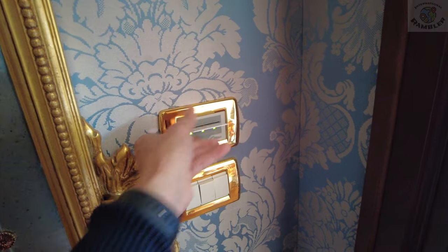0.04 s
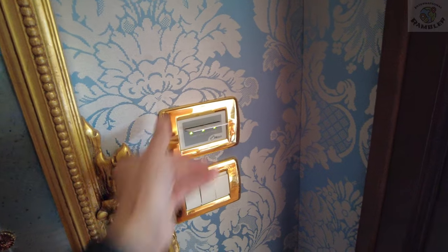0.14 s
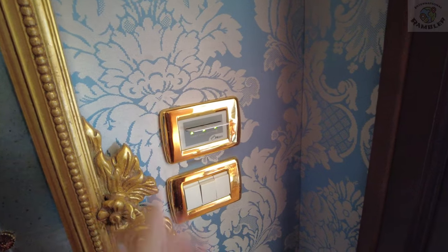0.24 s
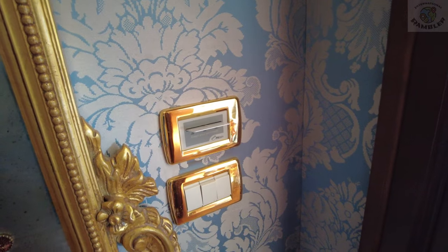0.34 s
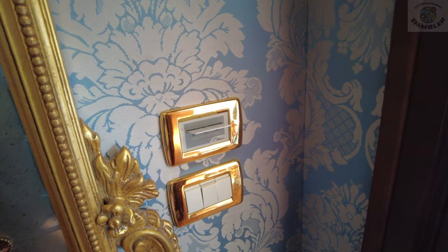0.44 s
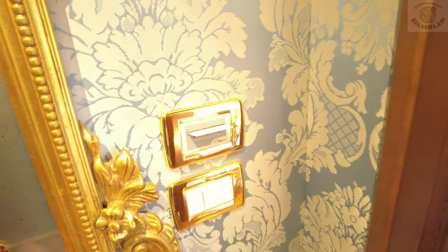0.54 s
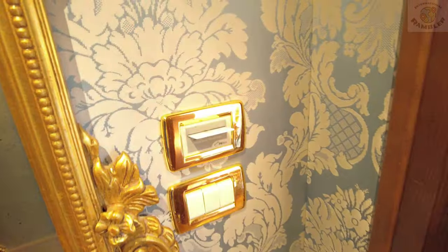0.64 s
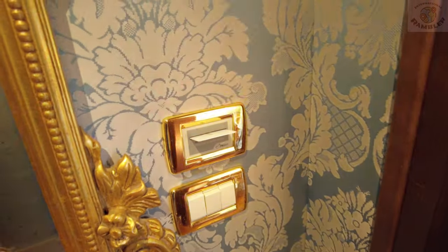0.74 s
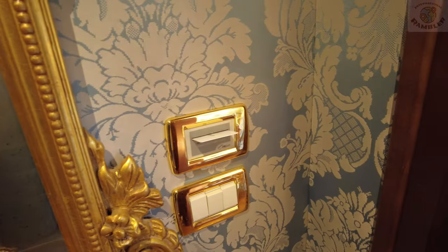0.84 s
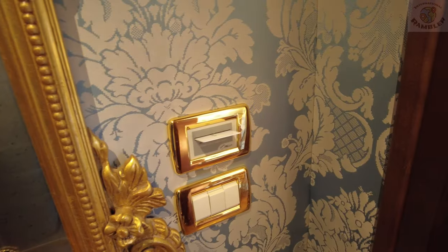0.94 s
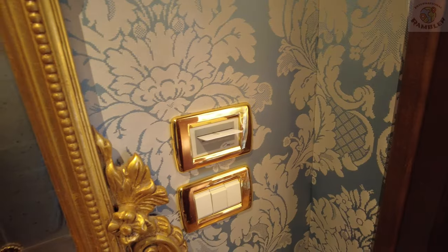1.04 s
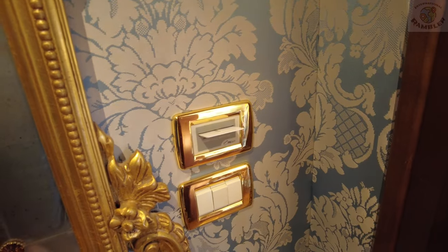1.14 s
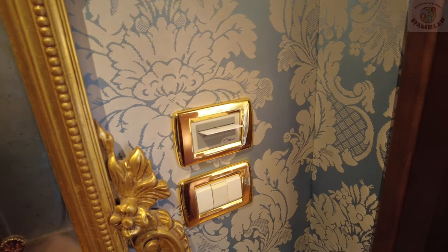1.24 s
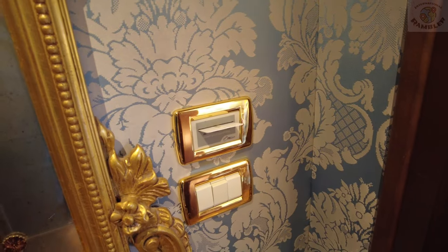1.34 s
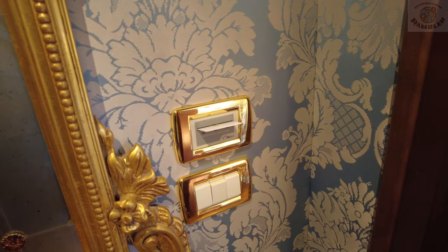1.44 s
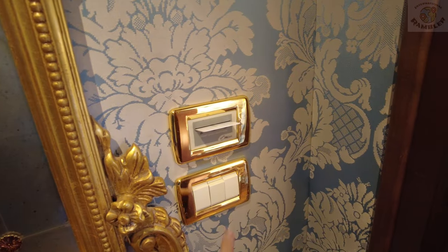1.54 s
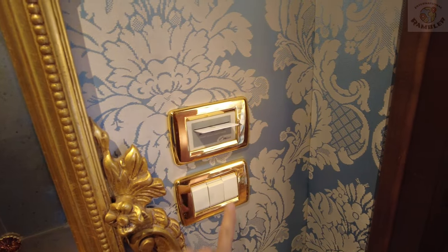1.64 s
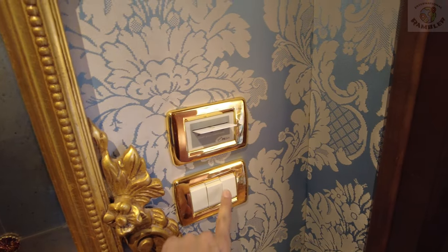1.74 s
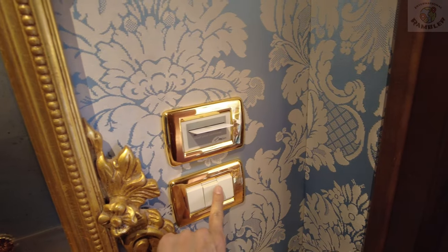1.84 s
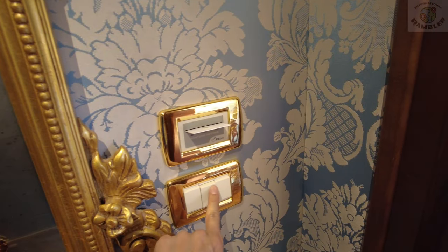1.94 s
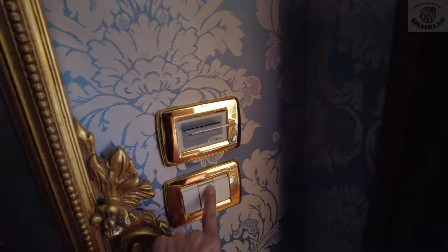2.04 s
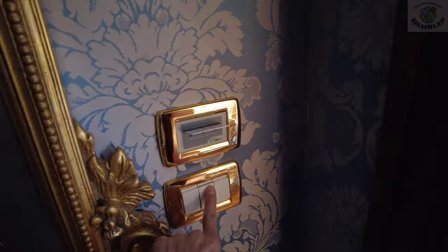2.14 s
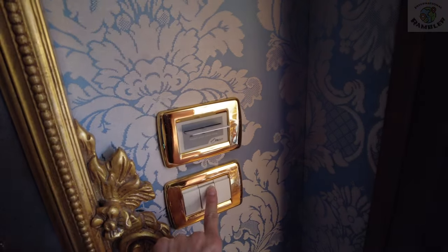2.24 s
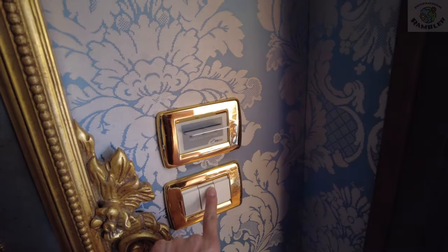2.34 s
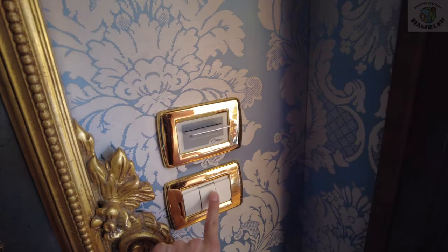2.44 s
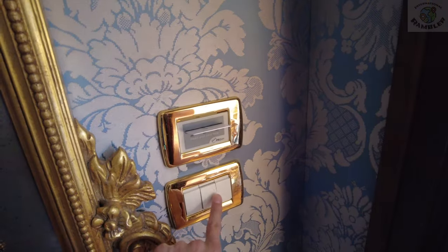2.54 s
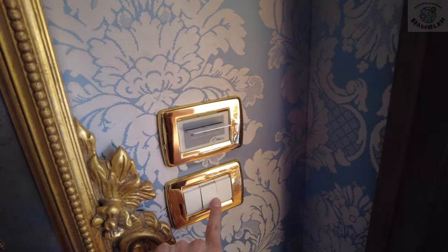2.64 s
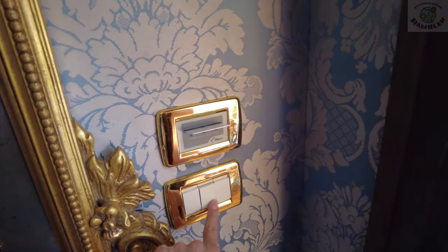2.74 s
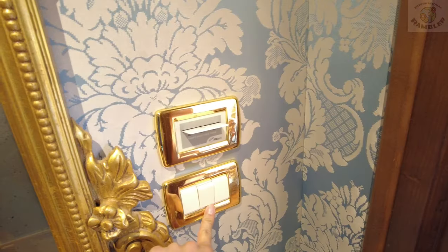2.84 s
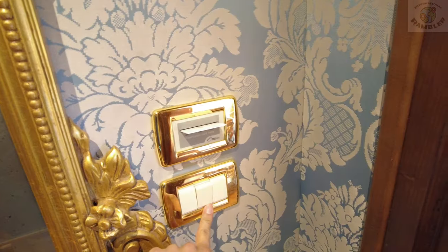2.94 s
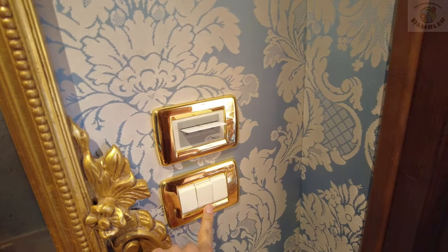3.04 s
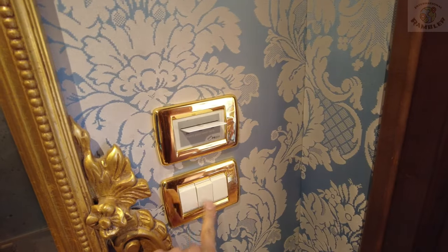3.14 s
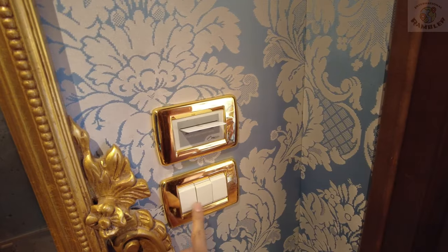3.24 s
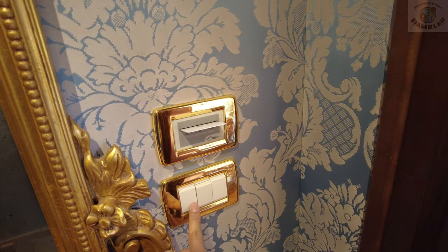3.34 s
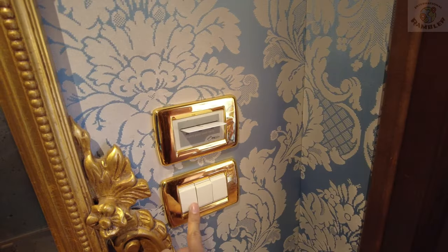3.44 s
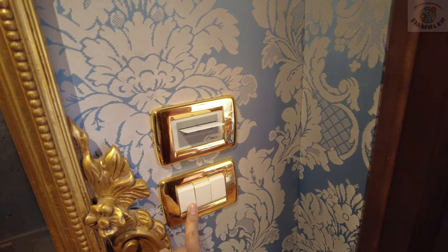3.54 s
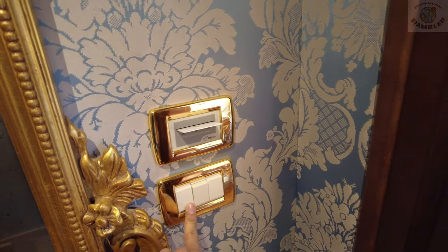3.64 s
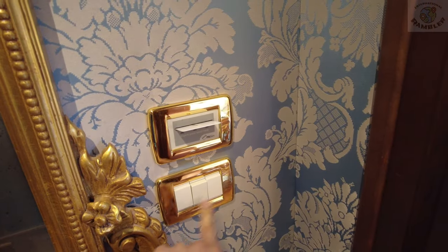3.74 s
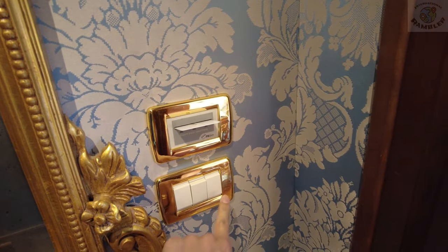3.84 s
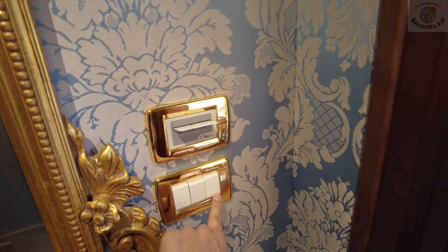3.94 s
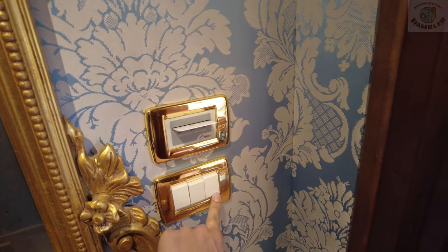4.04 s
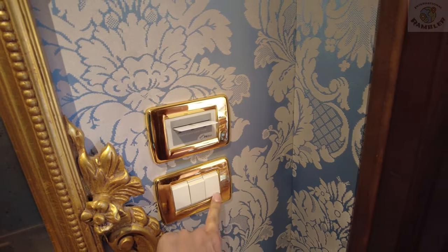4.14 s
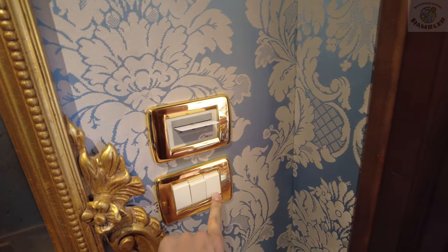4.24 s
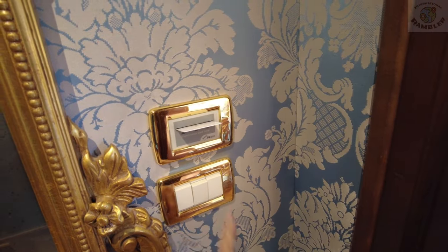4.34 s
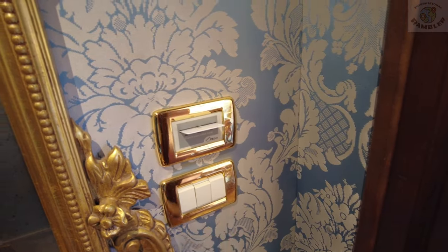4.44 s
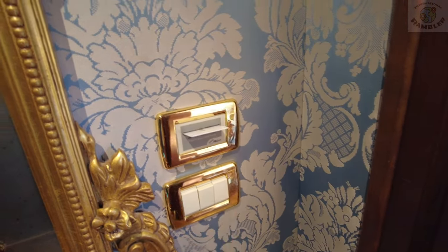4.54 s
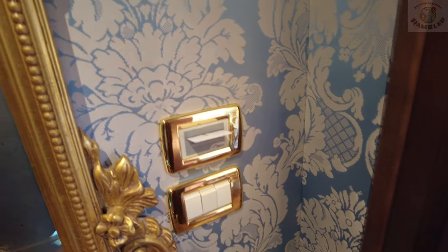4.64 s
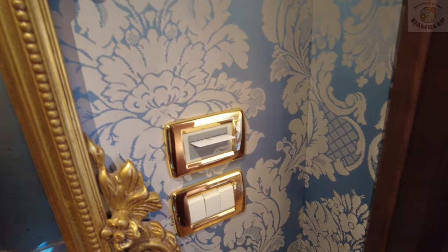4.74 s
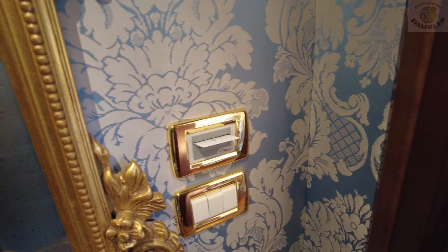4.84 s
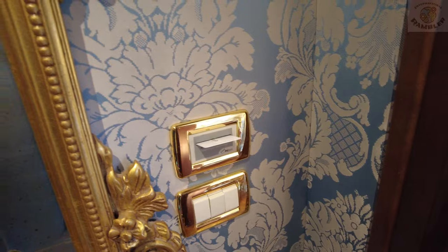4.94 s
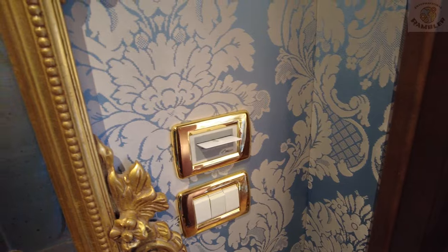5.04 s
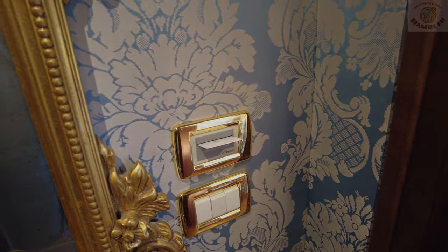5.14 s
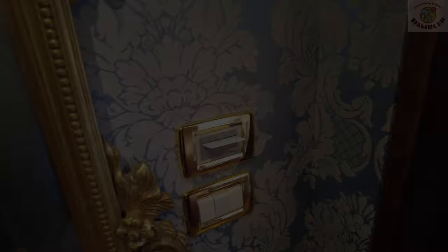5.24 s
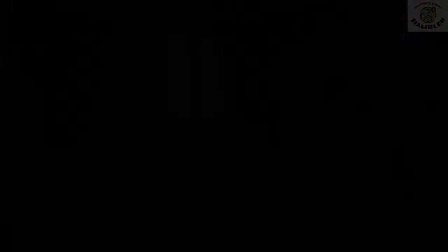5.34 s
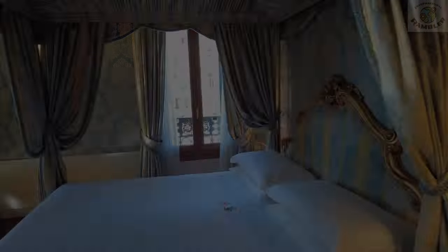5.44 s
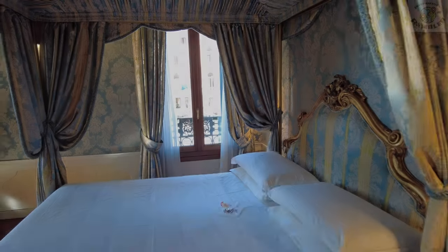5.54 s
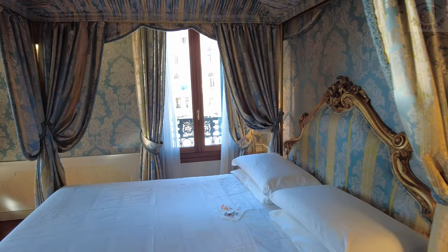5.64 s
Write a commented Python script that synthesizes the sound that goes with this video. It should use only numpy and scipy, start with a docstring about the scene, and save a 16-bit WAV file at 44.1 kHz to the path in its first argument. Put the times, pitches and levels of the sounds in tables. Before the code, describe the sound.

A very low machinery drone, around 50 Hz, wavers and throbs throughout, with a trace of mains hum and faint hiss. The microphone is close, in a small soft room with a brief answer. At the start there are very faint finger touches, a soft low push and rustling sleeve cloth. A tap at 0.46 s leads into a loud, scraping plastic crunch at 0.53 s as a card seats, with a deep wall thump. Cloth rustles to about 1.8 s. A light tap at 1.94 s precedes a bright, hard rocker snap at 2.15 s. Soft touches and a low push come near 2.6 s, then a snap at 2.84 s and a weaker, duller one at 2.93 s, with a brief scuff between. Dull plate taps follow at 3.09, 3.53 and 3.77 s. After a lull, cloth swells around 5.0 s, ending with a faint scuff and soft thump at 5.55 s.

```python
"""A machinery drone and room tone run throughout under a rustling sleeve, with fingertip taps and soft wall thumps.
A card holder latches with a crunch; plastic rocker switches snap over close by in a small soft room; a hand scuffs.
Contacts are chattering noise bursts that ring damped modes or take a spectral colour, with the room's answer added.
Cloth, scuffs, rumble and room tone are shaped stereo noise; the drone is two wavering tones with mains hum."""
import sys
import numpy as np
from scipy import signal
from scipy.fft import rfft, irfft, next_fast_len
from scipy.io import wavfile
from scipy.ndimage import uniform_filter1d, map_coordinates

SR = 44100
rng = np.random.default_rng(int(sys.argv[2]) if len(sys.argv) > 2 else 0)


def wrap_up_sound(samples):
    """Save the sound to the file named by the first command line argument, as 16-bit audio."""
    columns = np.atleast_2d(samples).T
    # keep every value between -1 and 1, then stretch to whole-number steps
    tamed = np.clip(columns, -1, 1)
    steps = np.round(tamed * 32767).astype(np.int16)
    wavfile.write(sys.argv[1], SR, steps)


N = 250483
BLOW_AT = SR // 100  # samples before the blow in every burst
TAIL = SR // 3  # samples of ringing and of room answer


def amp(db):
    """dB to gain."""
    return 10 ** (np.asarray(db) / 20)


def unit(x):
    """Scaled to rms 1."""
    return x / np.sqrt(np.mean(x ** 2) + 1e-20)


def along(points, hz):
    """Interpolates (frequency [Hz], value) points on a log frequency axis."""
    f, v = np.transpose(points)
    return np.interp(np.log(hz + 1), np.log(f + 1), v)


def curves(rows):
    """One value per sample for each column after the time."""
    s, *cols = np.transpose(rows)
    return [np.interp(np.arange(N) / SR, s, c) for c in cols]


def wobble(rate_hz):
    """Smooth random curve, rate_hz knots a second."""
    knots = rng.standard_normal(int(N * rate_hz / SR) + 4)
    return map_coordinates(knots, [np.arange(N) * rate_hz / SR])


def filtered(x, response):
    """x times a response of frequency."""
    m = next_fast_len(x.shape[-1] + 8192)
    spectrum = rfft(x, m) * response(np.fft.rfftfreq(m, 1 / SR))
    return irfft(spectrum, m)[..., :x.shape[-1]]


def rush(spectrum, alike, patchy_db):
    """Stereo noise of rms 1 with time-frequency patches of random gain."""
    z = signal.stft(rng.standard_normal((2, N)), nperseg=512)[2]
    field = uniform_filter1d(rng.standard_normal(z.shape[1:]), size=6, axis=0)
    field = uniform_filter1d(field, size=10, axis=1)
    pair = signal.istft(z * amp(patchy_db * unit(field)), nperseg=512)[1][:, :N]

    def mid_side(hz):
        turn = np.arccos(np.clip(along(alike, hz), -1, 1)) / 2
        return amp(along(spectrum, hz)) * [np.cos(turn), np.sin(turn)]

    mid, side = filtered(pair, mid_side)
    return unit(np.array([mid + side, mid - side]))


def ring(hz, t60_s, db, rise_s=1e-4):
    """Summed damped modes after one blow."""
    t = np.arange(TAIL)[:, None] / SR
    decay = amp(db - 60 * t / t60_s)
    return (decay * np.sin(2 * np.pi * hz * t) * (1 - np.exp(-t / rise_s))).sum(axis=1)


def chatter(length_s, lead_s=0.002, swell=0.31, evenness=0.58):
    """Uneven contacts of energy 1: a short faint lead-in, then a blow which dies fast."""
    t = np.arange(-BLOW_AT, SR // 20) / SR
    after = np.maximum(t, 0)
    lead_in = 0.18 * np.exp(-np.abs(t) / lead_s)
    blow = (1 - np.exp(-after / (swell * length_s))) * np.exp(-after / length_s)
    shape = lead_in + blow
    z = rfft(shape * rng.standard_normal(len(t)))
    even = irfft(z / np.abs(z) ** evenness, len(t))  # flatter spectrum: levels stay steady between draws
    burst = even * np.sqrt(shape)
    return burst / np.linalg.norm(burst)


# reverberation: (frequency [Hz], t60 [s])
ROOM_T60 = [(200, 0.6), (500, 0.23), (1400, 0.13), (4000, 0.12), (10000, 0.092)]
# side to mid of the room's answer: (frequency [Hz], ratio)
ROOM_SPREAD = [(100, .1), (300, 0.19), (550, 0.75), (1200, 0.17), (2500, 0.3), (8000, 1)]


def room(x):
    """Room answer: each frequency dies at its own speed; bass is alike at both ports."""
    hz, t, z = signal.stft(rng.standard_normal((2, TAIL)), SR, nperseg=256)
    width = along(ROOM_SPREAD, hz)[:, None]
    z = np.array([z[0] + width * z[1], z[0] - width * z[1]]) / np.sqrt(1 + width ** 2)
    decay = amp(-60 * t / along(ROOM_T60, hz)[:, None])
    tail = signal.istft(z * decay, SR, nperseg=256)[1]
    tail = tail / np.linalg.norm(tail[0])
    delayed = np.pad(x, (130, 0))[None]
    return signal.fftconvolve(delayed, tail, axes=1)[:, :len(x)]


# phase lead of the left port over the right: (frequency [Hz], lead [rad])
PORT_LEAD = [(500, -0.5), (2500, 1.6), (5000, -0.18), (9000, 1.56), (15000, 1.5)]


def add(track, s, x, wet_db):
    """Mixes a burst and the room's answer into both ports, with its blow at time s."""
    x = np.pad(x, (0, TAIL))

    def ports(hz):
        half_lead = .5j * along(PORT_LEAD, hz) * np.array([[1], [-1]])
        return amp([[.3], [-.3]]) * np.exp(half_lead)

    heard = filtered(x, ports) + amp(wet_db) * room(x)
    part = track[:, round(s * SR) - BLOW_AT:][:, :len(x)]
    part += heard[:, :part.shape[1]]


# drone levels, upper before its throb: (time [s], lower tone rms [dB], upper tone rms [dB])
DRONE_LEVELS = [(0.0, -35.5, -39), (0.35, -29, -29.5), (0.72, -40.5, -29.5), (1.09, -25, -37),
                (1.441, -35, -32), (2.501, -31.5, -40), (3.15, -27.5, -37), (3.57, -41, -35),
                (4.05, -29.5, -33.5), (4.7, -37, -29.5), (4.86, -27, -30.5), (5.39, -26.5, -35),
                (5.68, -44, -30)]
# lower and upper room resonance: (frequency [Hz], wander [Hz])
DRONE_TONES = [(46.3, 0.796), (57.5, 2.46)]
# mains hum: (frequency [Hz], rms level [dB])
HUM = (100, -52)
# rumble colour: (frequency [Hz], relative density [dB per Hz])
RUMBLE_COLOUR = [(11, -45), (18, -2), (32, -7), (54, -4.5), (71, -16), (86, -19), (118, -23.5), (150, -32),
                 (169, -24), (300, -38.5), (390, -52.5), (660, -120)]
RUMBLE_DB, SURGE_DB = -34.5, 2
THROB_HZ, THROB_DEPTH = 3.6, 0.65


def drone():
    """Machinery drives the lowest room resonances: two wavering tones, the upper throbbing, hum and rumble."""
    def sine(hz, drift_hz):
        cycles = np.cumsum(hz + drift_hz * wobble(5.8)) / SR + rng.random()
        return np.sin(2 * np.pi * cycles)

    low, high = (amp(db + 1.45 * wobble(4.98)) * sine(*tone)
                 for db, tone in zip(curves(DRONE_LEVELS), DRONE_TONES))
    tones = low + high * (1 + THROB_DEPTH * sine(THROB_HZ, 0.96))
    hum_hz, hum_db = HUM
    hum = amp(hum_db) * sine(hum_hz, .1)
    alike = [(30, 1.0), (90, 0.91), (150, .93), (300, 0.67)]  # (frequency [Hz], left-right likeness)
    rumble = amp(RUMBLE_DB + SURGE_DB * wobble(4.1)) * rush(RUMBLE_COLOUR, alike, patchy_db=1.43)
    return np.sqrt(2) * (tones + hum) * amp([[-.25], [.25]]) + rumble  # sqrt(2): sine peak over rms


# room tone colour: (frequency [Hz], relative density [dB per Hz])
HISS_COLOUR = [(120, -17), (200, -3.5), (300, -15), (450, -14.5), (700, -22), (1400, -20), (3000, -24),
               (5200, -26), (9000, -32.5), (12500, -38.5), (14500, -32.5), (15700, -30.5)]
# room tone: (frequency [Hz], left-right likeness)
HISS_ALIKE = [(60, 0.85), (180, 1), (550, 0.08), (1650, 0.052), (4970, 0.48), (15000, 0.29)]
HISS_DB, HISS_SWING_DB = -54, 1.5


def room_tone():
    """Coloured noise whose level swings slowly."""
    swing_db = HISS_SWING_DB * wobble(3.335)
    return amp(HISS_DB + swing_db) * rush(HISS_COLOUR, HISS_ALIKE, patchy_db=1.5)


# arm strokes: (time of greatest speed [s], rise [s], fall [s], level [dB], brightness at peak [dB per octave])
STROKES = [(.25, 0.26, 0.57, -47.5, 1.5), (.64, 0.17, 0.24, -42, 1.5), (1.06, 0.11, 0.1, -51.5, 2.5),
           (1.18, 0.099, 0.056, -52.5, 6.5), (1.66, 0.37, .2, -47, 2.5), (2.12, 0.088, 0.18, -53.5, -3.5),
           (2.64, 0.25, 0.063, -62, -5), (4.66, 0.28, 0.85, -51.5, 1), (4.999, 0.17, 0.15, -42, 3),
           (5.38, 0.11, 0.12, -57, 0)]
# cloth colour: (frequency [Hz], relative density [dB per Hz])
CLOTH_COLOUR = [(240, -32.5), (420, 2.5), (900, -3.5), (1570, 0.5), (3220, -3), (7950, -19.5),
                (12000, -26.5), (14500, -18), (15700, -30)]
EDGE_DB = 12  # drop one rise or fall away from the peak
DULLING = 0.13  # dB per octave lost per dB under the peak
FLUTTER_DB = .9


def sleeve():
    """Cloth slides on cloth; each stroke swells and fades, brightest at full speed."""
    t, power = np.arange(N) / SR, np.zeros((2, N))
    alike = [(300, 0.73), (700, 0.033), (1400, 0.18), (3000, 0.094), (15000, 0.16)]  # as HISS_ALIKE
    noise = rush(CLOTH_COLOUR, alike, patchy_db=1.0)
    # crossfade over four octaves about 2500 Hz
    dull, bright = (filtered(noise, lambda hz: np.clip(.5 + k * np.log2((hz + 1) / 2500) / 4, 0, 1))
                    for k in (-1, 1))
    for s, rise_s, fall_s, db, tilt_db in STROKES:
        under_db = EDGE_DB * ((t - s) / np.where(t < s, rise_s, fall_s)) ** 2
        tilt_db = np.maximum(tilt_db - DULLING * under_db, -10)
        power += amp(db - under_db + np.outer([-2, 2], tilt_db)) ** 2
    rustle = np.sqrt(power[0]) * dull + np.sqrt(power[1]) * bright
    return amp(FLUTTER_DB * wobble(25)) * rustle


# light touches: (time [s], level [dB], relative tick level [dB], plate pitch factor)
TAPS = [(0.037, -48.5, -8.5, 1.1), (0.048, -49, -12, 0.69), (0.4636, -25, -10.5, 0.92),
        (1.923, -55, -25, 1), (1.939, -39.5, -20, 1.08), (2.6601, -38.5, -23, 0.896),
        (2.6852, -57, -1, 1.04), (3.091, -29, -27, 0.9), (3.5337, -35, -19, 0.91),
        (3.7662, -38.5, -17, 0.99)]
# cover plate modes at pitch factor 1: (frequency [Hz], t60 [s], relative level [dB])
PLATE_MODES = [(1300, 0.0027, -13), (1572, 0.016, 0.5), (1700, 0.016, -1.5), (2030, 0.011, -3),
               (2444, 0.019, -8), (2910, 0.01, -11), (3530, 0.014, -10.5), (4480, 0.01, -11)]
# nail tick colour: (frequency [Hz], relative density [dB per Hz])
NAIL_COLOUR = [(1000, 0), (3000, 8), (6000, 2.5), (10000, 3), (15000, 1.5)]
TOUCH_S, TICK_DB, TAP_WET_DB = 0.0023, 25, -3.5


def taps():
    """Fingertip and nail touch the cover plate: a dull ring and a bright tick."""
    out = np.zeros((2, N))
    hz, t60_s, mode_db = np.transpose(PLATE_MODES)
    for s, db, tick_db, pitch in TAPS:
        plate = signal.fftconvolve(chatter(TOUCH_S), ring(hz * pitch, t60_s, mode_db))
        tick = filtered(chatter(TOUCH_S), lambda f: amp(along(NAIL_COLOUR, f)))
        add(out, s, amp(db) * plate, TAP_WET_DB)
        add(out, s, amp(db + tick_db + TICK_DB) * tick, TAP_WET_DB)
    return out


# soft pushes: (time [s], level [dB], tilt [dB per octave])
THUMPS = [(.05, -23, 7.5), (.548, -9.5, -1), (2.572, -22.5, 8), (5.56, -29.5, 6)]
# wall modes: (frequency [Hz], t60 [s], relative level [dB])
WALL_MODES = [(80.5, 0.21, 0), (119, 0.37, -14), (155, 0.19, -15), (176.6, 0.1, -12.5), (251.7, 0.17, -20),
              (404, 0.047, -22)]


def thumps():
    """A soft push moves only the wall's low modes."""
    out = np.zeros((2, N))
    hz, t60_s, mode_db = np.transpose(WALL_MODES)
    for s, db, tilt_db in THUMPS:
        push = ring(hz, t60_s, db + mode_db + tilt_db * np.log2(hz / 150), rise_s=0.0079)
        add(out, s, np.pad(push, (BLOW_AT, 0)), wet_db=-21)
    return out


# card scraping home: (time [s], relative energy [dB], length [s], tilt [dB per octave])
CRUNCHES = [(0.525, 13, 0.013, 5), (0.532, 12, 0.012, -1.5), (.545, 10.5, 0.0081, 1.5)]
# latch colour: (frequency [Hz], relative density [dB per Hz])
LATCH_COLOUR = [(150, -24), (250, -3.5), (421, -2.5), (710, -8), (845, -5), (1010, -10.5), (1530, -5.5),
                (2440, -15), (16000, -35)]


def latch():
    """Plastic scrapes and crunches as the card seats."""
    out = np.zeros((2, N))
    for s, db, length_s, tilt_db in CRUNCHES:
        colour = lambda f: amp(along(LATCH_COLOUR, f) + tilt_db * np.log2((f + 100) / 2000))
        add(out, s, amp(db) * filtered(chatter(length_s), colour), wet_db=-0.5)
    return out


# rocker snaps: (time [s], level [dB], stop struck [0 upper - 1 lower], chatter [s],
#                treble tilt [dB per octave], relative box boom [dB])
SNAPS = [(2.152, -4, 0.12, 0.0047, 2.5, 1), (2.8426, -5.5, 0.95, 0.0024, 2.5, 1.5),
         (2.9259, -13.5, 0.9, 0.0037, -3, 4.5)]
# switch modes: (frequency [Hz], t60 [s], relative level from upper stop [dB], from lower stop [dB])
ROCKER_MODES = [(1288, 0.037, -14.5, -5), (1482, 0.013, 8.5, 3.5), (1716, 0.058, -18, -5),
                (2160, 0.015, -11, -26), (2625, 0.097, -23, -7.5), (3080, 0.013, -0.5, 0.5),
                (3576, 0.05, -7, -24.5), (4040, 0.0063, -4.5, -25.5), (4100, 0.027, -21.5, -10),
                (5730, 0.03, -6, -14), (6580, 0.0165, -9.5, -4.5), (7100, 0.0047, 6, -16.5),
                (9400, .015, -34.5, -26.5), (9380, 0.017, -1.5, -29.5), (12400, 0.013, -23, -22),
                (13440, 0.018, -13.5, -5)]
# wall box modes: same columns
BOX_MODES = [(172, 0.11, -21, -22), (239, 0.079, -14, -14.5), (308, 0.058, -16, -11.5),
             (407, 0.13, -20, -14), (488, 0.042, -25, -8.5), (592, 0.079, -9.5, -15),
             (894, 0.07, -11.5, -34)]
# contact noise of upper stop, lower stop: (frequency [Hz], relative density [dB per Hz])
STOP_COLOURS = ([(700, -30), (1000, -24), (1470, -3), (2300, -27), (3300, 0), (4100, 6.5), (5000, -6.5),
                (10100, -14.5), (13800, -11), (15800, -10.5)], [(700, -48), (1050, -36), (1250, 9.5),
                (1750, 1), (2250, -5.5), (2800, -0.5), (4250, -6.5), (5600, -8), (9000, -14),
                (13000, -16.5), (15800, -16.5)])
RING_DB, CRACK_DB, BOOM_DB = -10, 21.5, -5.5  # shares of a snap
SNAP_WET_DB, BOX_WET_DB = -5.5, -7
SNAP_SWELL = 0.36  # swell time over chatter time


def rockers():
    """The spring throws the rocker on a stop, where it chatters and rings switch and box."""
    out = np.zeros((2, N))
    for s, db, stop, length_s, tilt_db, boom_db in SNAPS:
        hz, t60_s, upper_db, lower_db = np.transpose(ROCKER_MODES)
        mode_db = upper_db + stop * (lower_db - upper_db) + tilt_db * np.log2(hz / 2000)
        ringing = signal.fftconvolve(chatter(length_s, swell=SNAP_SWELL), ring(hz, t60_s, mode_db))
        add(out, s, amp(db + RING_DB) * ringing, SNAP_WET_DB)

        colour = lambda f: amp(along(STOP_COLOURS[round(stop)], f) + tilt_db * np.log2((f + 500) / 2000))
        crack = filtered(chatter(length_s, swell=SNAP_SWELL), colour)
        add(out, s, amp(db + CRACK_DB) * crack, SNAP_WET_DB)

        # the heavy box feels the chatter as one push
        hz, t60_s, upper_db, lower_db = np.transpose(BOX_MODES)
        mode_db = upper_db + stop * (lower_db - upper_db)
        boom = ring(hz, t60_s, db + BOOM_DB + mode_db + boom_db, rise_s=0.0024)
        add(out, s, np.pad(boom, (BLOW_AT, 0)), BOX_WET_DB)
    return out


# dull scuffs: (time [s], level [dB], fade [s])
SCUFFS = [(2.871, -38, .036), (5.554, -47.5, 0.094)]
# scuff colour: (frequency [Hz], relative density [dB per Hz])
SCUFF_COLOUR = [(200, -20), (400, 1), (750, -12), (1350, -5.5), (1900, -13), (3000, -48)]
SCUFF_RISE_S = 0.0094


def scuffs():
    """A soft surface drags briefly: dull uneven noise, quick to start, slow to fade."""
    t, shape = np.arange(N) / SR, np.zeros(N)
    for s, db, fade_s in SCUFFS:
        after = np.maximum(t - s, 0)
        shape += amp(db) * (1 - np.exp(-after / SCUFF_RISE_S)) * np.exp(-after / fade_s)
    noise = rush(SCUFF_COLOUR, [(300, 0.67), (1500, 0.55)], patchy_db=0.5)
    return shape * amp(2.5 * wobble(60)) * noise


def scene():
    """Contacts over cloth, drone and room tone."""
    background = drone() + room_tone() + sleeve()
    return background + taps() + thumps() + latch() + rockers() + scuffs()


TOP_HZ = 15800


def record(dry):
    """The input rounds off the highest peaks; nothing is kept above the band limit."""
    rounded = dry / (1 + np.abs(dry / .95) ** 6) ** (1 / 6)
    return filtered(rounded, lambda hz: hz < TOP_HZ)


dry = scene()
out = record(dry)
wrap_up_sound(out)
```